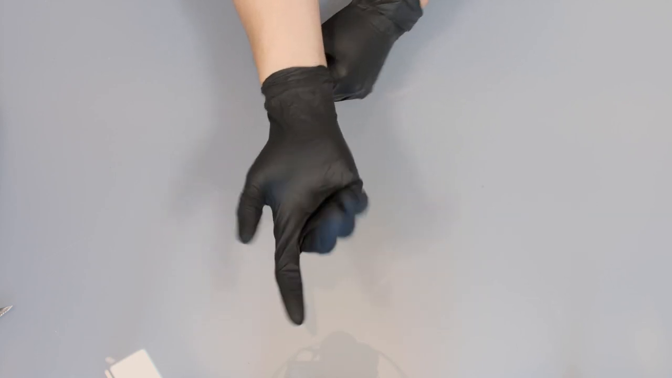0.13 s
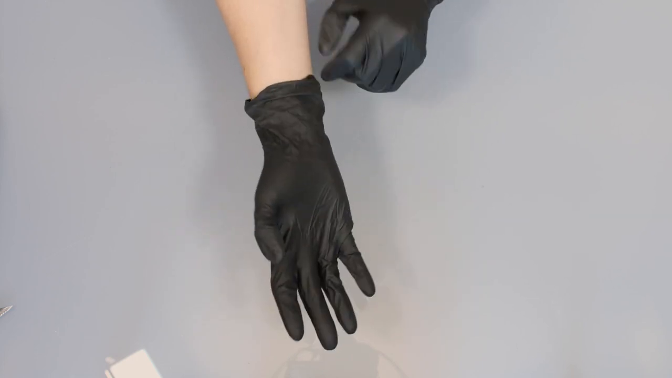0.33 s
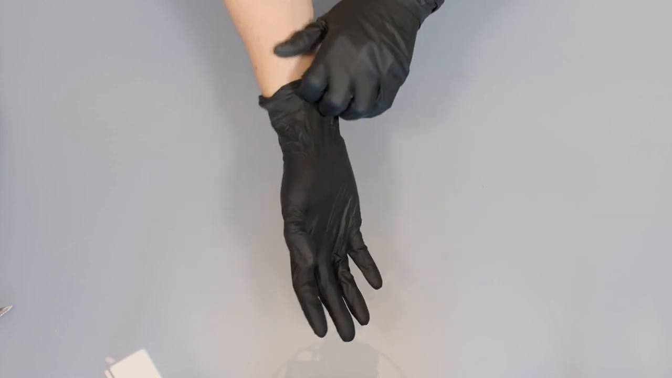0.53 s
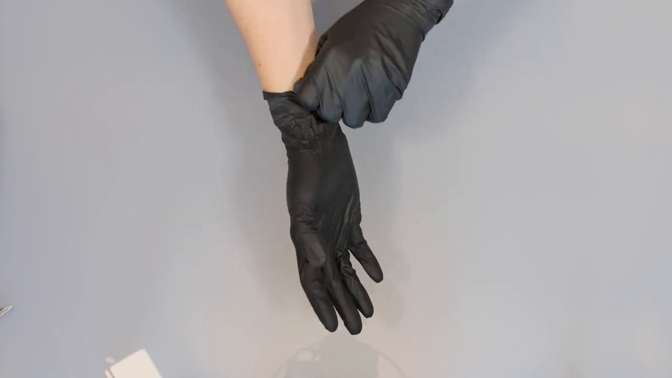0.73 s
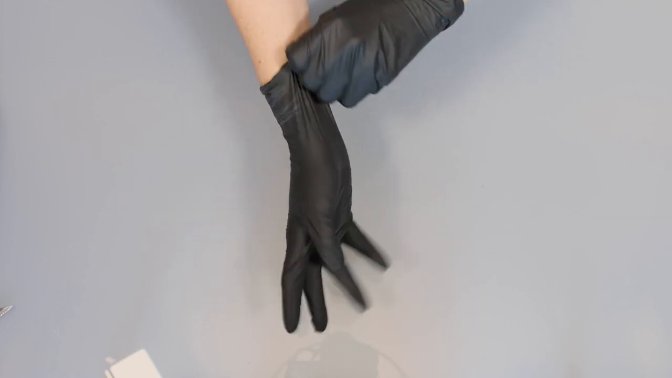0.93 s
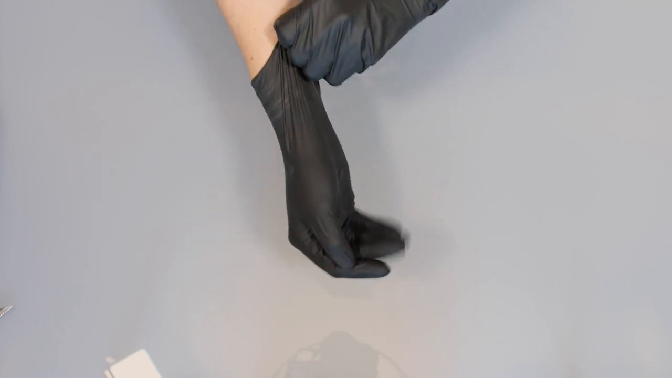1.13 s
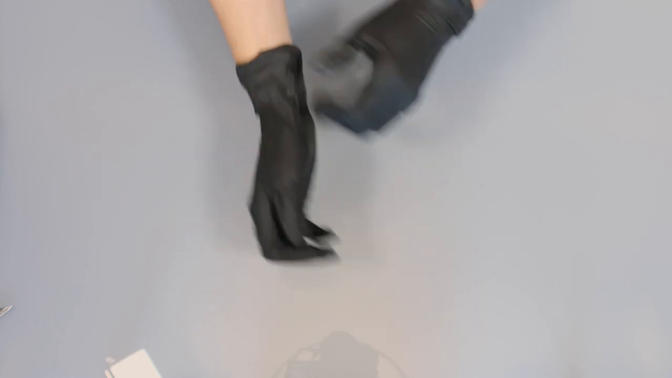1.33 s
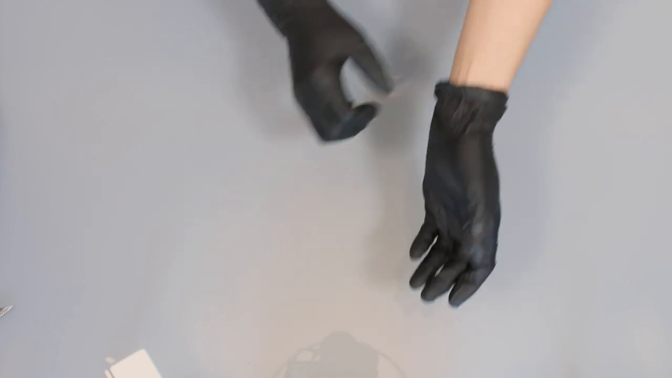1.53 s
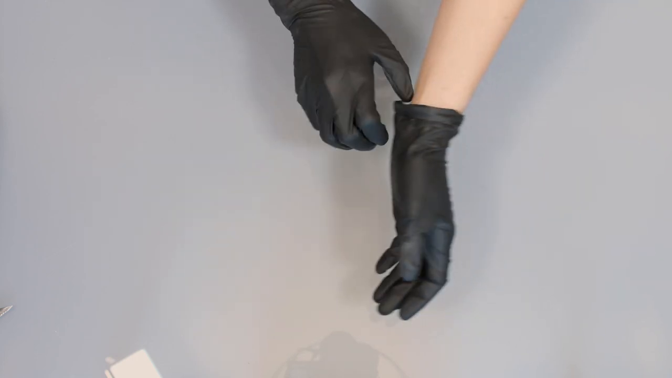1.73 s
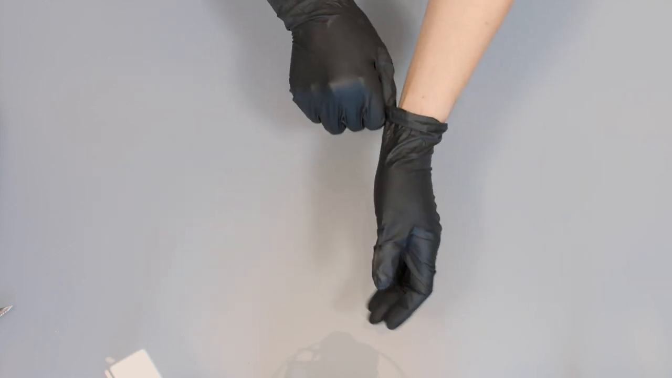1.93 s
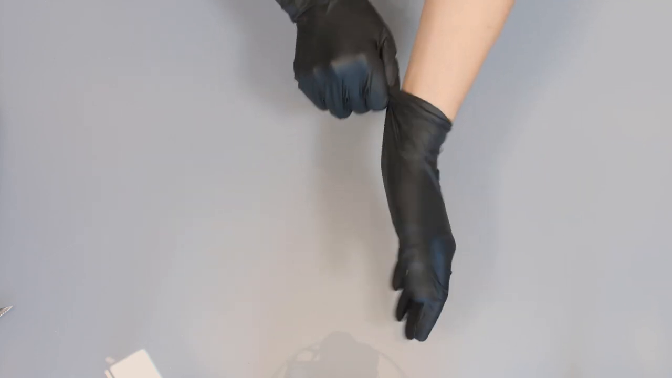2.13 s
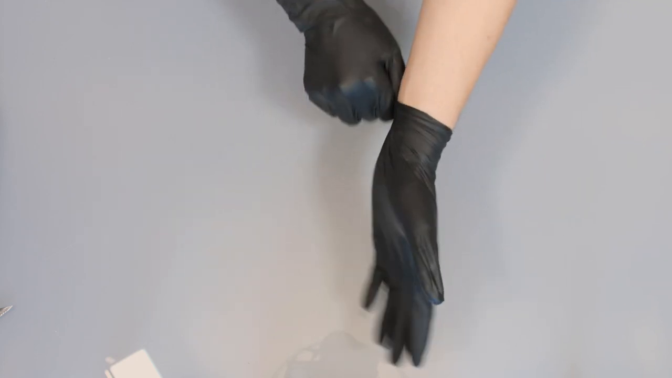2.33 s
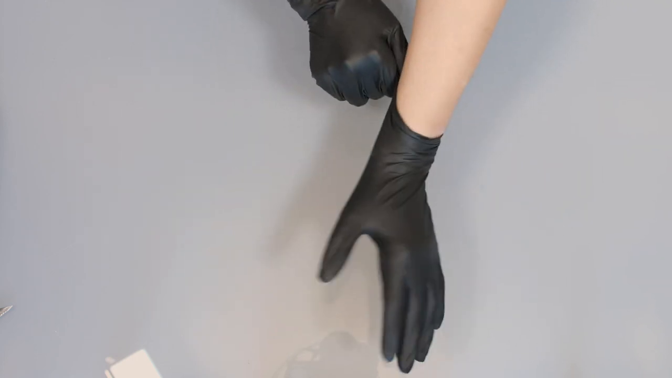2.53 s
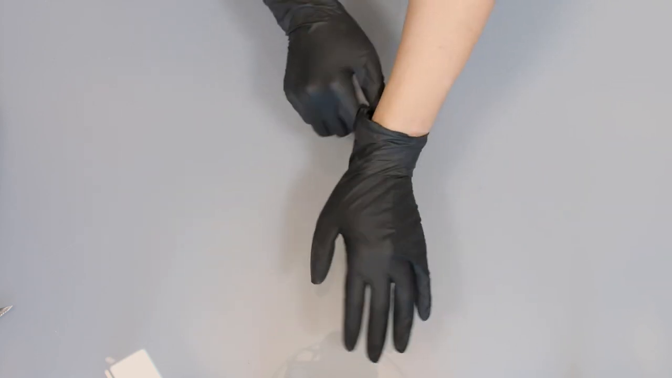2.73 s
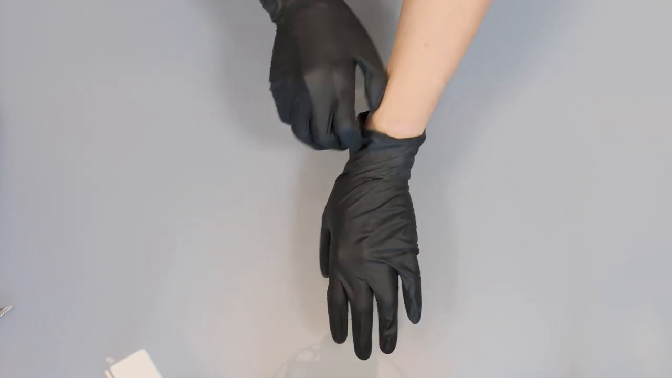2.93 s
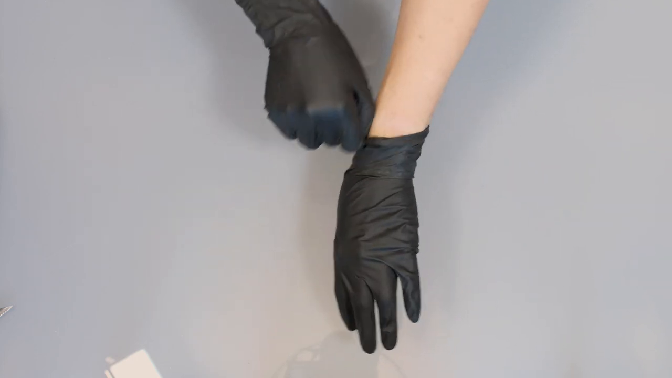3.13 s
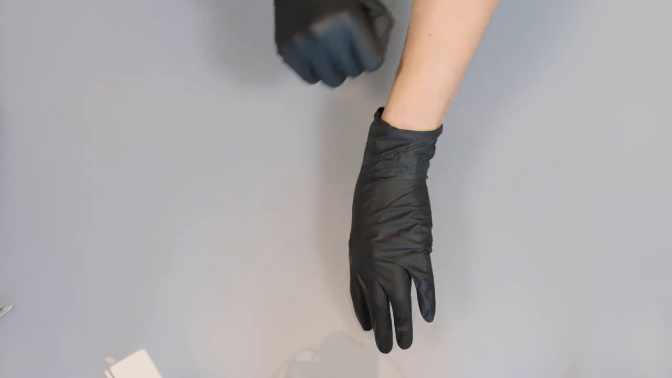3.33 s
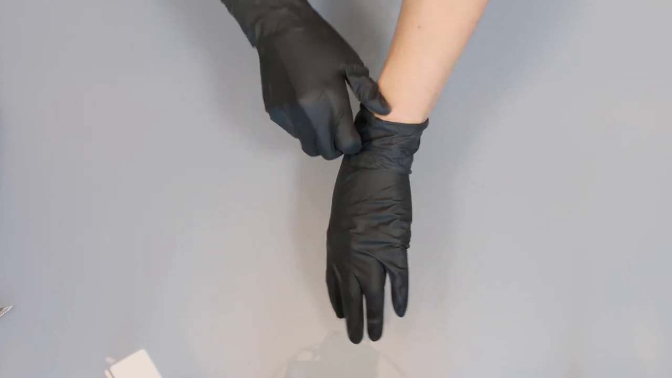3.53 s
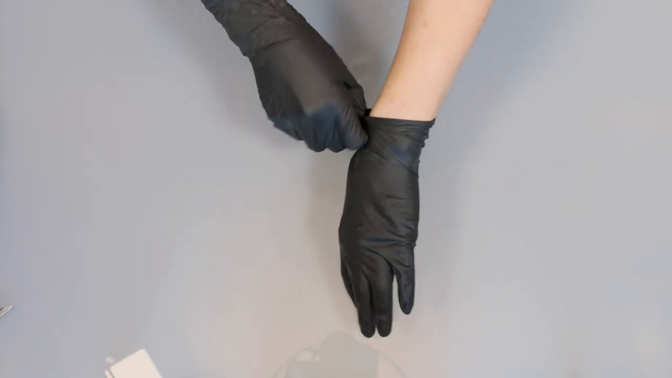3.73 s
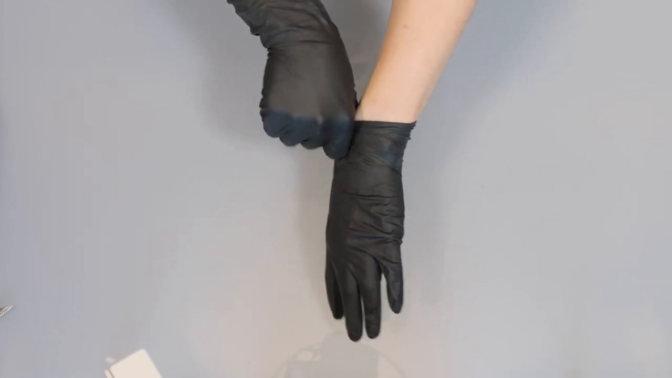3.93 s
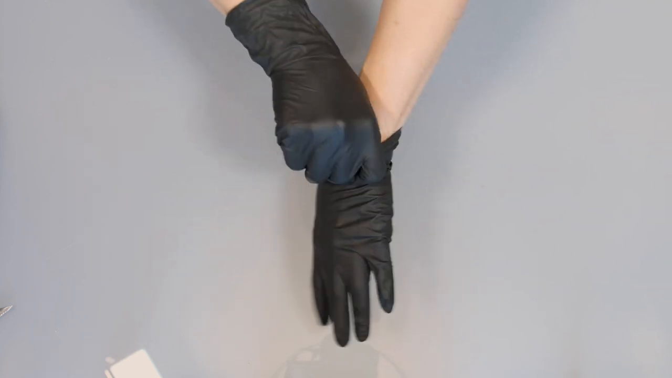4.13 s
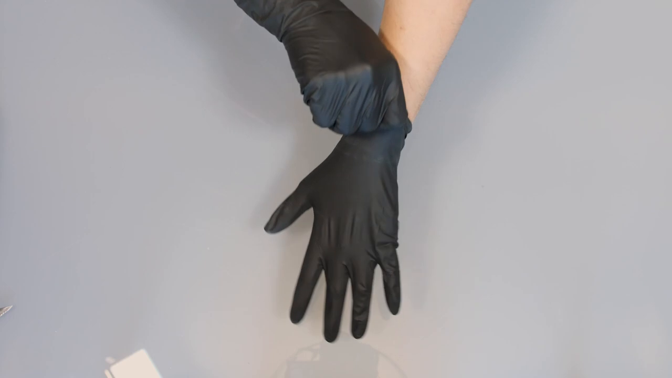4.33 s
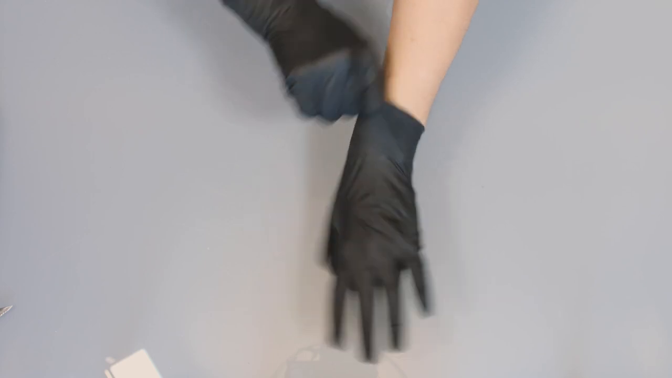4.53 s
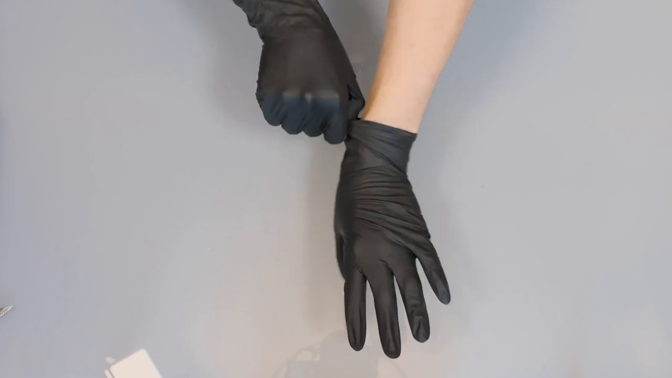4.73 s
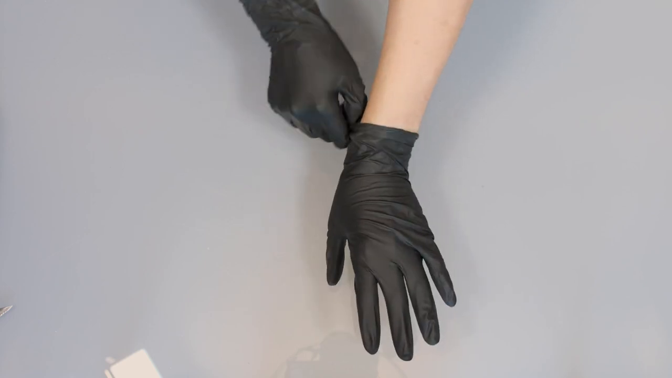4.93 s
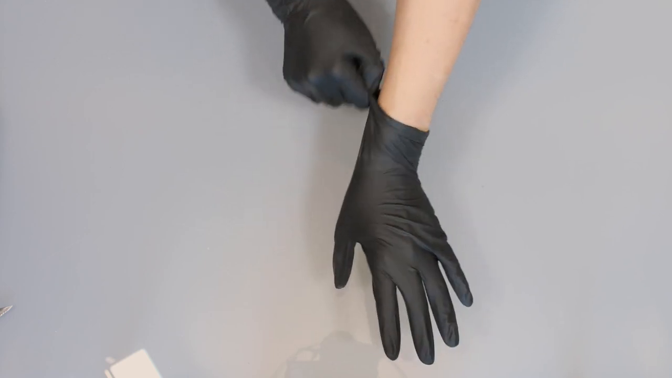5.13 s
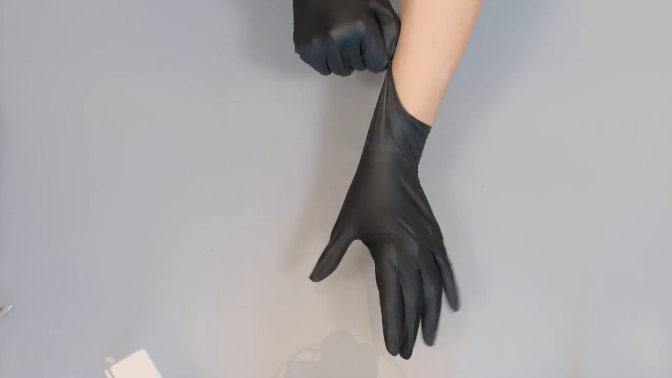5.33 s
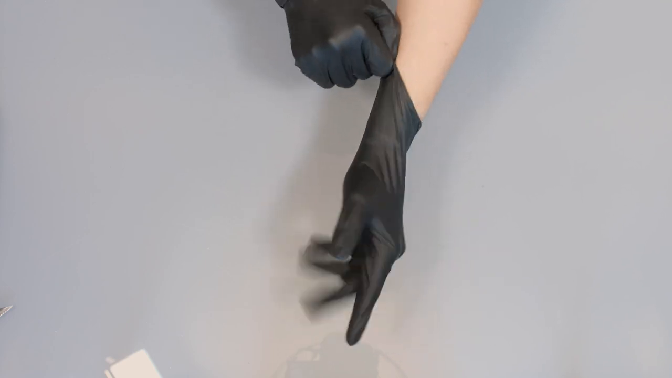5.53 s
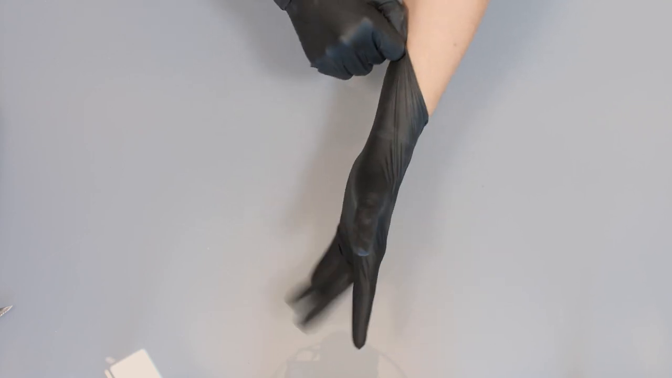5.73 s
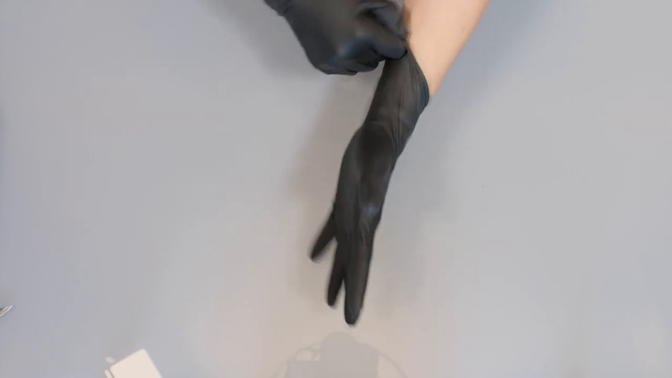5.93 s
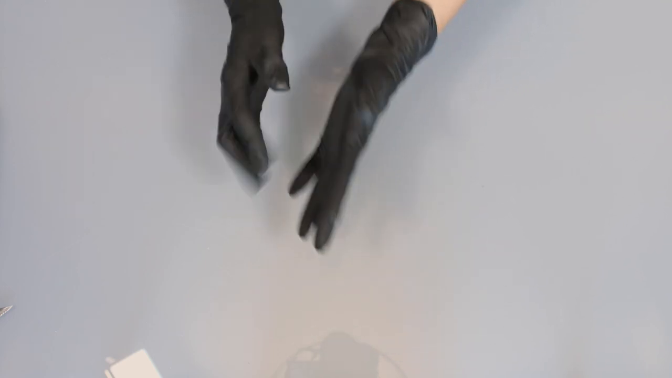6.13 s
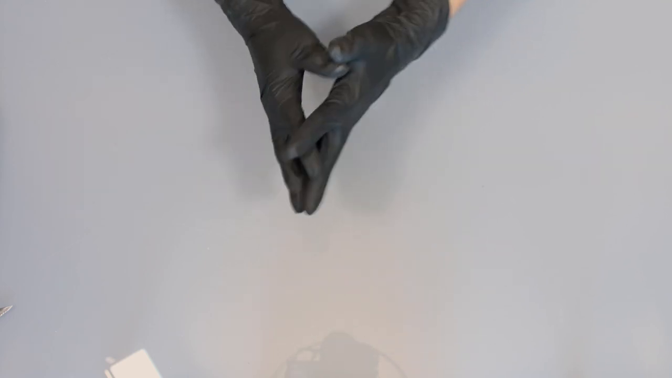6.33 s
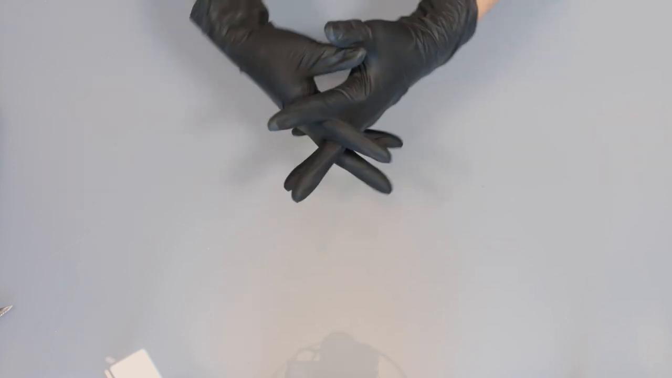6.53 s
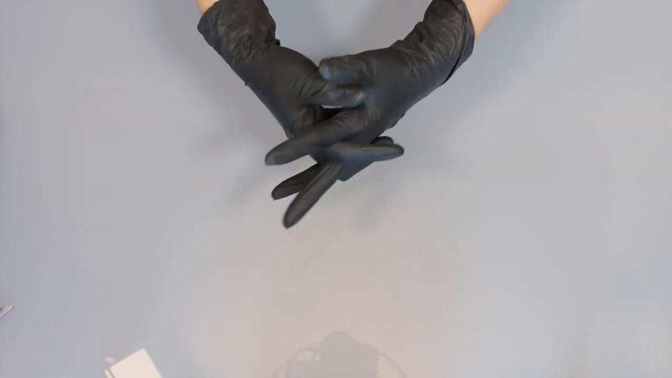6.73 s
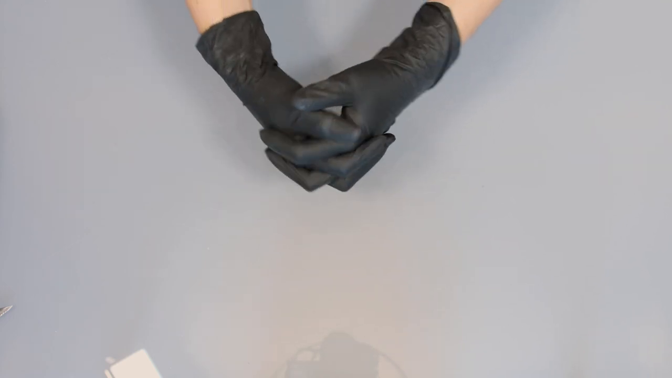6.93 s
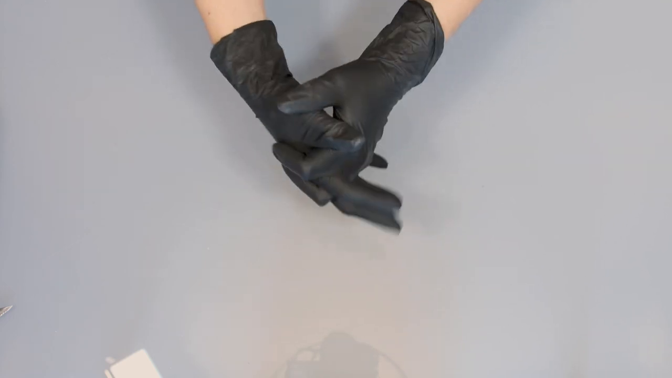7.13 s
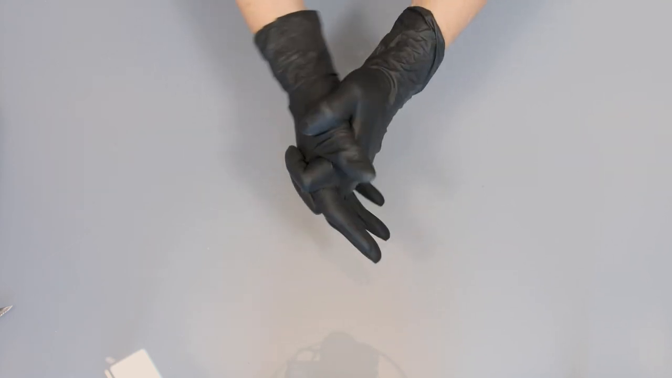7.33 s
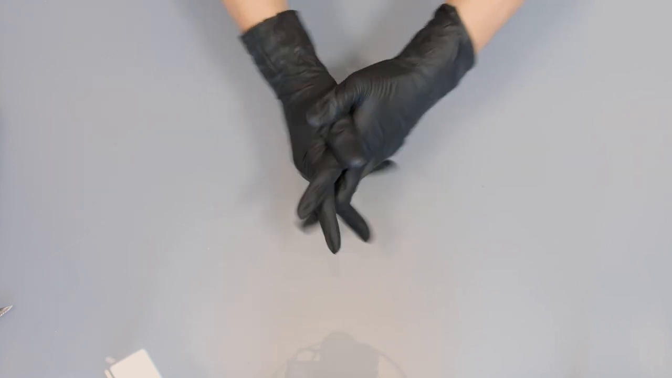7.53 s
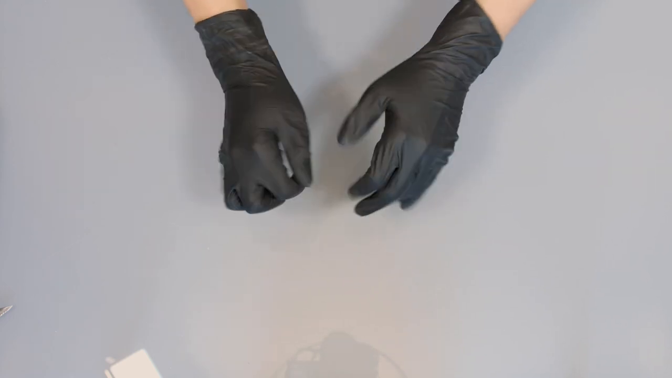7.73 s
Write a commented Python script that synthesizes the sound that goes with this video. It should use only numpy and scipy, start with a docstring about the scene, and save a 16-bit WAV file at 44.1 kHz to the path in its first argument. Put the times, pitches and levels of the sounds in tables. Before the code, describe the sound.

A close, nearly mono microphone catches disposable rubber gloves being adjusted. Fine rubbery rustling swells and fades over faint room air, dotted with sharp crease pops and squeaky stick-slip ticks. A hard cuff snap lands with a dull pat before the midpoint, and another bright crack follows later. Finally a loud pop and a tight cluster of hissing rubs come as the gloved hands slide apart.

```python
"""Close to a microphone in a small room, thin rubber gloves are tugged down at the cuff and worked over the fingers.
From the start sliding rubber hisses in fine slips, and the first stretched rubber snaps back within a quarter second.
Then wrinkles crinkle and pop, slack film flaps and pats, and the cuff creaks in stick-slip as it is dragged.
The loudest snap onto the wrist comes at 3.3 s, and a barely audible 20 Hz throb swells and fades from 3.9 s.
Near the end the gloved fingers interlock and are drawn apart in a cluster of strong rubs."""
import sys
import numpy as np
from scipy import signal
from scipy.fft import rfft, irfft, next_fast_len
from scipy.io import wavfile
from scipy.ndimage import uniform_filter1d, map_coordinates

SR = 44100
rng = np.random.default_rng(int(sys.argv[2]) if len(sys.argv) > 2 else 0)


def unload_audio(sound):
    """Save the sound as a 16-bit wav file, at the path given as the first command line argument."""
    columns = np.transpose(np.atleast_2d(sound))
    # keep every value between -1 and 1, then stretch to whole-number steps
    steps = np.round(np.clip(columns, -1, 1) * 32767)
    wavfile.write(sys.argv[1], SR, steps.astype(np.int16))


N = 343980

# Single creases that flip over. Each row: start in seconds, level in dB, ring in Hz.
POPS = [(1.062, -31, 2240), (1.104, -28, 1560), (1.1327, -15.5, 4230), (1.228, -22, 1490),
        (1.2503, -20, 1710), (2.1648, -19.5, 3240), (2.1863, -22, 2600), (3.2345, -23.5, 6200),
        (3.871, -28, 3180), (3.952, -27, 2090), (4.0836, -22, 3270), (4.2561, -22, 3730),
        (4.4198, -22, 2800), (5.057, -23, 3720), (5.375, -31.5, 2460), (5.4267, -35, 2480),
        (5.4568, -23, 2550), (5.477, -28, 2190), (5.837, -34, 3220), (6.303, -23.5, 3580),
        (6.9771, -14, 3120), (7.174, -25.5, 2620)]
# Stretched rubber let go. Each row: start in seconds, level in dB, time scale of the contacts in seconds,
# brightness in dB per octave above 1500 Hz, cuff tension from 0 to 1.
SNAPS = [(0.1932, -24, 0.0045, -3, 0.5), (1.8133, -25, 0.0012, 2.5, 0.27), (2.7065, -15.5, 0.0014, 5, 0),
         (3.289, -6.5, 0.0022, -0.7, 0.96), (4.648, -17, 0.00091, 1.5, 0), (5.1442, -22, 0.0015, 0.5, 0),
         (6.0238, -8, 0.00082, 3, 0), (6.406, -27, 0.0039, -1, 0.8)]


def amp(db):
    """Decibels to gain."""
    return 10 ** (np.asarray(db) / 20)


def unit(x):
    """Scale to rms 1."""
    return x / np.sqrt(np.mean(x ** 2) + 1e-20)


def along(points, hz):
    """Read a curve of (Hz, value) points on a log frequency axis."""
    point_hz, values = np.transpose(points)
    return np.interp(np.log(hz + 1), np.log(point_hz), values)


def wobble(rate):
    """A smooth random curve of rms 1 with rate knots a second."""
    knots = rng.standard_normal(N // 10)
    return unit(map_coordinates(knots, [np.arange(N) * rate / SR], order=2, mode="wrap"))


def colour(x, gain_db):
    """Causal minimum-phase filter, by folding the cepstrum; gain_db gives the gain in dB at each Hz."""
    size = 4096
    cepstrum = irfft(np.log(amp(gain_db(np.fft.rfftfreq(size, 1 / SR)))))
    cepstrum[1:size // 2] *= 2
    cepstrum[size // 2:] = 0
    impulse_response = irfft(np.exp(rfft(cepstrum)))
    return signal.fftconvolve(x, impulse_response)[:len(x)]


def add(track, s, sound):
    """Mix a short sound into a track at time s."""
    part = track[round(s * SR):][:len(sound)]
    part += sound[:len(part)]


def ping(t, hz, cycles):
    """A heavily damped swing of the film whose envelope peaks at 1 after the given cycles."""
    u = t * hz / cycles
    return (u * np.exp(1 - u)) ** 2 * np.sin(2 * np.pi * hz * t)


def quiet_air():
    """The quiet of the place between the handling: steady noise, weakest in the treble."""
    # Each row: frequency in Hz, gain in dB.
    quiet_curve = [(25, 7.5), (100, 5), (400, -14), (1500, 3), (8000, -47), (15000, -61)]
    noise = rng.standard_normal(N)
    return amp(-65.5) * unit(colour(noise, lambda hz: along(quiet_curve, hz)))


def room(x):
    """The walls answer with a short tail of noise; each frequency dies at its own speed."""
    # Each row: frequency in Hz, time to fall by 60 dB in seconds.
    decay_times = [(200, 0.38), (3000, 0.29), (8000, 0.28), (15000, 0.34)]
    wall_delay = 0.0037  # s
    hz, t, z = signal.stft(rng.standard_normal(SR // 2), SR, nperseg=256)
    decay = amp(-60 * t / along(decay_times, hz)[:, None])
    tail = signal.istft(z * decay, SR, nperseg=256)[1]
    tail = np.pad(tail, (round(wall_delay * SR), 0))
    return signal.fftconvolve(x, tail / np.linalg.norm(tail))[:N]


def low_throb():
    """A very low, soft throb, barely audible, swells and fades: one 20 Hz sine under a slow envelope."""
    t = np.maximum(np.arange(N) / SR - 3.89, 0)  # starts at 3.89 s
    u = t / 0.22
    swell = (u * np.exp(1 - u)) ** 2  # fullest after 0.22 s
    return amp(-38.0) * swell * np.sin(2 * np.pi * 20.0 * t)


def slaps():
    """Air under the film is pushed out in dull pats: of slack film, and under every pop and every snap."""
    # Slack film slaps the skin and pushes out air, at times along with a snap or a pop.
    # Each row: start in seconds, level in dB, pitch in Hz.
    film_slaps = [(1.276, -39.5, 157), (2.495, -37, 205), (2.641, -38.5, 300), (3.291, -25.5, 109),
                  (3.904, -29, 210), (4.322, -34.5, 127), (5.49, -27.5, 296), (5.649, -32, 158),
                  (6.522, -34.5, 100), (6.978, -28.5, 326)]
    puff_db, puff_hz = -38, 270  # the air that a flipping crease pushes out
    # a snap traps air against the wrist: dB relative to the snap, more dB at full cuff tension, Hz
    thud_db, thud_taut_db, thud_hz = -25.5, 15.5, 229
    track, t = np.zeros(N), np.arange(SR // 20) / SR
    puffs = [(s, puff_db, puff_hz) for s, _, _ in POPS]
    thuds = [(s, db + thud_db + thud_taut_db * tension, thud_hz) for s, db, _, _, tension in SNAPS]
    for s, db, hz in film_slaps + puffs + thuds:
        add(track, s, amp(db) * ping(t, hz, cycles=0.41))
    return track


def creaks():
    """Rubber sticks and slips at an uneven rate; its resonance glides as the free length of film changes."""
    # Rubber dragged over skin or rubber, from slow ticking to a squeak. Each row: start in seconds,
    # length in seconds, level in dB, first pitch in Hz, last pitch in Hz, typical slips a second.
    drags = [(1.04, 0.14, -38, 2150, 1440, 180), (1.229, 0.085, -37.5, 1400, 2020, 206),
             (2.25, 0.04, -38, 960, 546, 250), (4.13, 0.021, -22.5, 2770, 2550, 207),
             (4.44, 0.093, -41.5, 1330, 1470, 360), (4.494, 0.024, -28, 3460, 3600, 1000),
             (4.646, 0.11, -38.5, 1360, 790, 310), (4.682, 0.1, -34, 600, 495, 315),
             (5.238, 0.081, -33, 2430, 2540, 110), (5.388, 0.026, -37.5, 2750, 2650, 160),
             (6.493, 0.07, -25.5, 2800, 2620, 395), (6.641, 0.055, -29, 2080, 1580, 104),
             (6.978, 0.028, -35.5, 1220, 800, 287)]
    track, t = np.zeros(N), np.arange(SR // 40) / SR
    for s, length, db, first_hz, last_hz, rate in drags:
        gap, strength, pitch = rng.standard_normal((3, SR // 500))
        progress = np.cumsum(np.exp(0.14 * gap)) / (rate * length)
        for u, blow, detune in zip(progress[progress < 1], strength, pitch):
            hz = (first_hz + u * (last_hz - first_hz)) * np.exp(0.13 * detune)
            # the film swings, the contact ticks
            slip = ping(t, hz, cycles=1.0) + 0.6 * ping(t, 3960, cycles=0.62)
            swell = np.sqrt(np.sin(np.pi * u))
            add(track, s + u * length, amp(db + 4.2 * blow) * swell * slip)
    return track


def pops():
    """A crease flips: a short chirp of the film and a soft push of air; tighter creases also tick."""
    track, t = np.zeros(N), np.arange(SR // 40) / SR
    for s, db, hz in POPS:
        tight = min(hz / 3700, 1) ** 3
        tick = rng.choice([-1, 1], len(t)) * np.exp(-t / 0.0018)
        cycles = np.interp(db, [-30, -20], [1.7, 0.9])  # a harder flip is shorter and sharper
        chirp = (1 - tight / 2) * ping(t, hz, cycles)
        push = 0.12 * ping(t, 540, cycles=0.64)
        add(track, s, amp(db) * (chirp + 0.26 * tight * tick + push))
    return track


def snaps():
    """Stretched rubber lands in a quick ripple of contacts, coloured by the cuff the more it is taut."""
    # Resonances of the taut cuff. Each row: centre in Hz, half width in Hz, lift in dB.
    cuff_modes = [(1500, 99, 4), (2670, 200, 11.5), (3570, 300, 14)]
    # Colour of the bare crack. Each row: frequency in Hz, gain in dB.
    crack_curve = [(150, -0.5), (700, 7), (4000, 5), (8700, 2), (10500, -8), (14000, -10.5)]
    track, t = np.zeros(N), np.arange(SR // 12) / SR

    def cuff_db(f):
        return sum(lift / (1 + ((f - hz) / width) ** 2) for hz, width, lift in cuff_modes)

    for s, db, decay, bright_db, tension in SNAPS:
        landing = np.exp(-(t / decay - 0.4) ** 2 / 2)
        settling = 0.13 * np.exp(-t / 0.012)
        contacts = rng.choice([-1, 1], len(t)) * (landing + settling)
        # the contacts carry even power across the bands, so the rubber alone sets the colour
        power = np.abs(rfft(contacts, 4096)) ** 2
        uneven_db = 10 * np.log10(uniform_filter1d(power, size=60))

        def rubber_db(hz):
            brightness = bright_db * np.log2(np.maximum(hz, 1500))
            return along(crack_curve, hz) + tension * cuff_db(hz) + brightness

        crack = colour(contacts, lambda hz: rubber_db(hz) - uneven_db)
        # a longer crack carries more energy at the same level
        add(track, s, amp(db - 4.5) * np.sqrt(decay * SR) * crack / np.linalg.norm(crack))
    return track


def grains(spectrum, rate, spread_db, smooth):
    """Tiny slips of uneven size at random moments, over a share of smooth noise; rms 1."""
    moments = rng.random(N) < rate / SR
    sizes = amp(spread_db * np.clip(rng.standard_normal(N), -2, 2))
    slips = moments * sizes * rng.choice([-1, 1], N)
    force = np.sqrt(1 - smooth) * unit(slips) + np.sqrt(smooth) * rng.standard_normal(N)
    return unit(colour(force, lambda hz: along(spectrum, hz)))


def wrinkles():
    """Small wrinkles flip in passing; their pitch wanders with the tension of the film."""
    track, t = np.zeros(N), np.arange(SR // 100) / SR
    tension = wobble(11)
    for place, size, detune in rng.standard_normal((450, 3)):
        at = int(place * N) % N
        hz = 2400 * np.exp(0.056 * tension[at] + 0.13 * detune)
        add(track, at / SR, amp(-3.0 + 10.5 * np.clip(size, -2, 2)) * ping(t, hz, cycles=0.75))
    return track


def effort():
    """Each stroke swells and dies away over a faint fidgeting; levels in dB of hiss, crinkling and flapping."""
    # Rubs of rubber over skin or rubber. Each row: time of fastest motion in seconds, rise in seconds,
    # fall in seconds, hiss in dB, crinkling in dB over the hiss, flapping in dB over the hiss.
    strokes = [(.1, 0.025, 0.041, -44.5, -1, -4.5), (0.204, 0.013, 0.099, -42, -4, -14),
               (.335, 0.063, 0.022, -39, -6.5, -11.5), (.63, .035, 0.033, -42.5, -9.5, -15),
               (.925, 0.021, .08, -43.5, -8, -15.5), (1.11, 0.1, 0.13, -46, -1.5, -5),
               (1.255, 0.045, 0.031, -38.5, -6, -16), (1.348, 0.014, 0.035, -43, -5.5, -10),
               (1.946, .09, 0.032, -43.5, -9, -17), (2.085, 0.1, 0.076, -48, -2, -8.5),
               (2.223, 0.04, 0.05, -41.5, -3, -2), (2.462, 0.079, 0.047, -41, -6, -4),
               (2.71, 0.056, 0.064, -47, -8, -7.5), (2.912, 0.13, 0.085, -38.5, -10, -18),
               (3.09, .06, 0.091, -48.5, -8, -15), (3.228, 0.021, 0.046, -41.5, -5, -2.5),
               (3.449, 0.025, 0.049, -51.5, -0.5, -21), (3.594, 0.0086, 0.021, -45.5, -9, -4),
               (3.725, 0.047, 0.11, -43.5, -8.5, -16.5), (4.123, 0.069, 0.065, -42.5, 0, -4.5),
               (4.321, 0.052, 0.049, -40.5, -5, -10), (4.503, 0.024, 0.013, -38.5, -3, -8),
               (4.701, 0.23, 0.087, -42.5, -1.5, -9), (4.878, 0.023, 0.032, -39.5, -11.5, -7),
               (5.15, 0.51, 0.39, -51.5, -8.5, -6.5), (5.519, 0.04, 0.034, -44, 1, -5),
               (5.65, 0.051, 0.027, -43.5, -2, -9.5), (5.95, 0.029, 0.066, -55, -6, -2),
               (6.2, 0.08, 0.074, -49, -3.5, -5.5), (6.391, 0.069, 0.039, -45, -8.5, -12.5),
               (6.517, 0.03, 0.025, -32, -18, -14), (6.571, 0.091, 0.065, -43.5, 0, -14.5),
               (6.67, 0.021, 0.08, -60, 11, 9), (7.061, 0.092, 0.055, -45.5, -1, -11.5),
               (7.15, 0.03, 0.07, -46, -0.5, -19), (7.526, 0.031, 0.079, -40.5, -6, -21),
               (7.605, 0.036, 0.016, -32, -1, -11), (7.638, 0.042, 0.022, -28, -16.5, -22),
               (7.709, 0.023, 0.012, -34, -8.5, -14), (7.79, 0.057, .05, -38.5, -9.5, -16)]
    # Faint rustle of the fingers between strokes, dipping briefly after the loudest snap.
    # Each row: time in seconds, level in dB.
    fidget = [(0, -52.5), (.45, -58), (1.7, -60.5), (2.1, -61), (3.4, -58), (3.55, -67.5), (3.65, -56.5),
              (4.0, -56.5), (5.8, -58), (6.9, -61.5), (7.8, -56.5)]
    # Share of that rustle, in one row: hiss, crinkling and flapping, each in dB over the rustle level.
    fidget_colour = (-0.5, -4, -4.5)
    stroke_shape = 1.64  # 1 = a pointed swell, 2 = a rounded one
    t = np.arange(N) / SR
    power = np.outer(amp(fidget_colour), amp(np.interp(t, *np.transpose(fidget)))) ** 2
    for s, rise, fall, db, crinkle_db, flap_db in strokes:
        near = slice(*np.searchsorted(t, [s - 4 * rise, s + 4 * fall]))
        away = np.maximum((s - t[near]) / rise, (t[near] - s) / fall)
        speed = np.exp(-away ** stroke_shape)
        power[:, near] += np.outer(amp([db, db + crinkle_db, db + flap_db]), speed) ** 2
    return 10 * np.log10(power)


def rubbing():
    """Rubber slides in fine slips, wrinkles buckle in coarser ones, and loose film flaps."""
    # Colours of the sliding, the buckling and the flapping. Each row: frequency in Hz, gain in dB.
    hiss_curve = [(1200, -25), (2600, -9), (3800, -1.5), (6500, -3.5), (8500, -1), (10200, -12),
                  (13000, -8), (15500, -19.5)]
    crinkle_curve = [(350, -9.5), (700, -3.5), (1600, 1), (2000, -0.5), (2600, 4.5), (3500, -3),
                     (5500, -22.5)]
    flap_curve = [(25, -9.5), (70, -5.5), (170, -0.5), (280, 1), (400, 0.5), (550, 1), (1200, -21.5)]
    hiss_db, crinkle_db, flap_db = effort()
    grip_db = 1.3 * wobble(130)  # the film catches and lets go unevenly
    # rate in slips a second
    slide = grains(hiss_curve, rate=1500, spread_db=5.5, smooth=0.45)
    buckle = grains(crinkle_curve, rate=650, spread_db=5, smooth=0.35)
    flap = grains(flap_curve, rate=200, spread_db=3.0, smooth=0.32)
    hiss = amp(hiss_db + grip_db) * slide
    crinkle = amp(crinkle_db + grip_db + 0.63) * buckle + amp(crinkle_db) * wrinkles()
    return hiss + crinkle + amp(flap_db + grip_db + 0.5) * flap


def scene():
    """The hands work straight ahead of the microphone, so the sound is almost mono."""
    gloves = rubbing() + pops() + snaps() + slaps() + creaks()
    mid = gloves + amp(-11.0) * room(gloves) + quiet_air() + low_throb()
    # only a second, fainter wall answer differs between left and right
    side = colour(room(gloves), lambda hz: along([(2500, -24.5), (13000, -16.5)], hz))
    return np.array([mid + side, mid - side])


def record(dry):
    """The recorder keeps nothing above its band limit."""
    top_hz = 15800
    size = next_fast_len(N + SR // 2)
    kept = np.fft.rfftfreq(size, 1 / SR) < top_hz
    return irfft(rfft(dry, size) * kept, size)[:, :N]


dry = scene()
out = record(dry)
unload_audio(out)
```